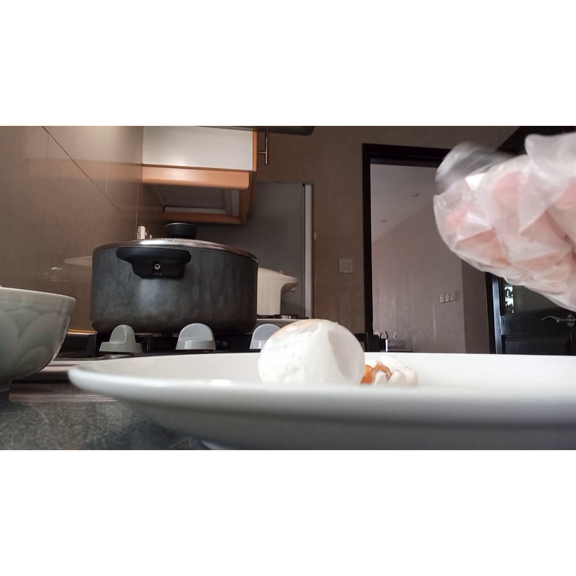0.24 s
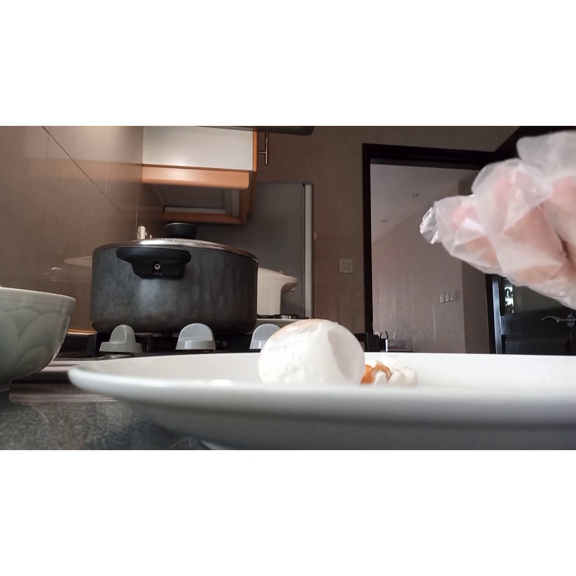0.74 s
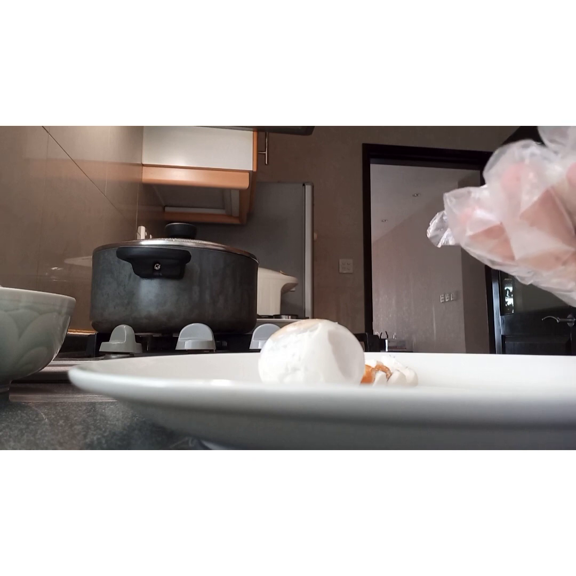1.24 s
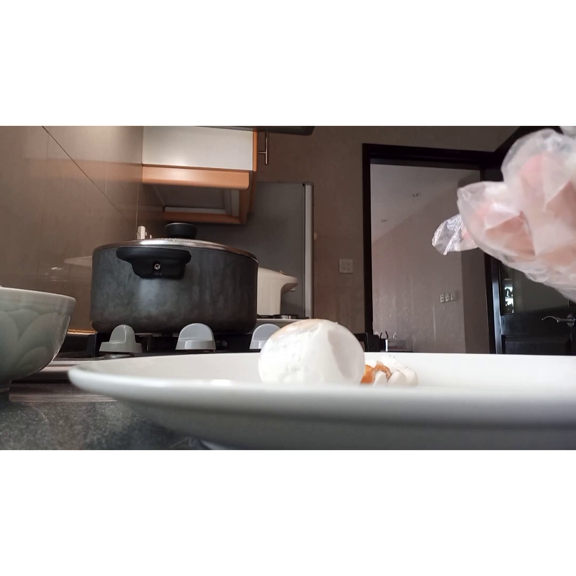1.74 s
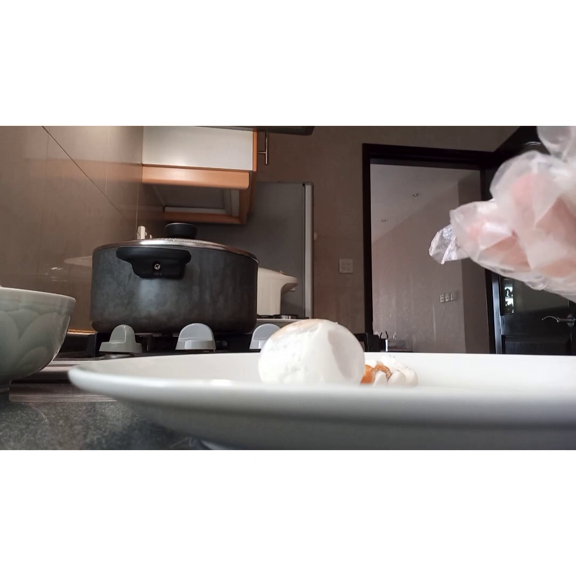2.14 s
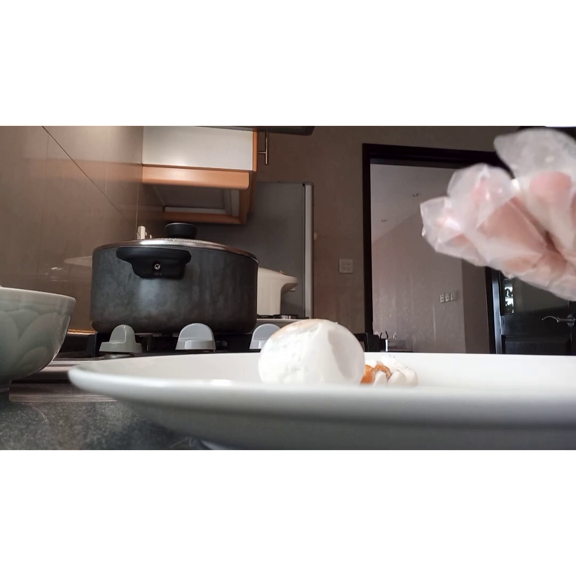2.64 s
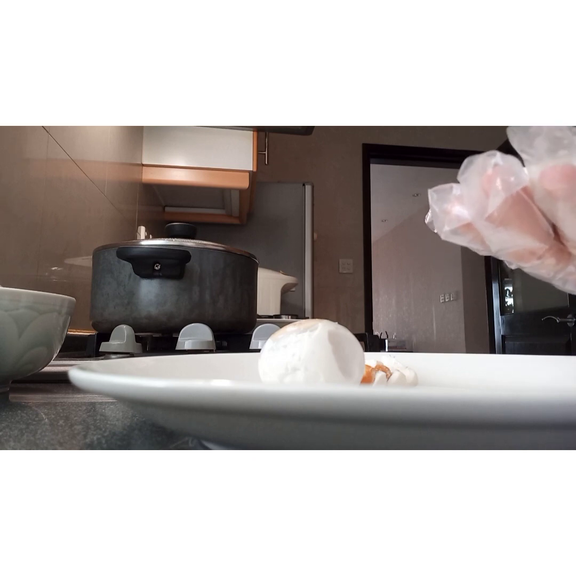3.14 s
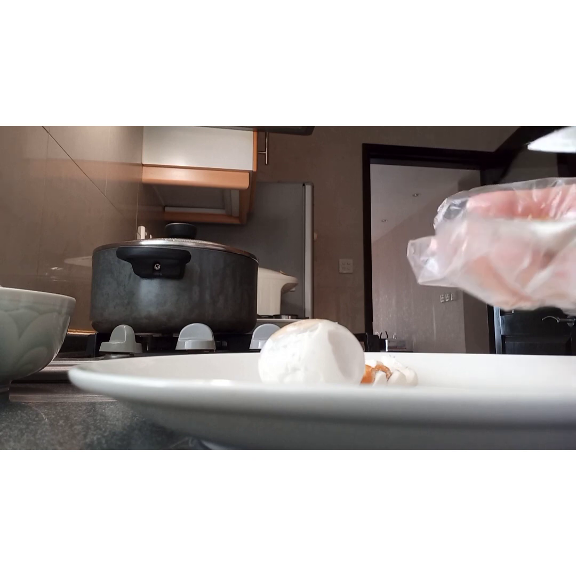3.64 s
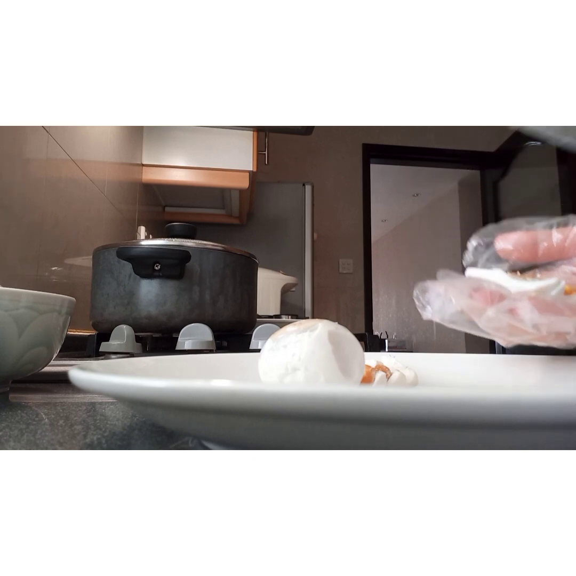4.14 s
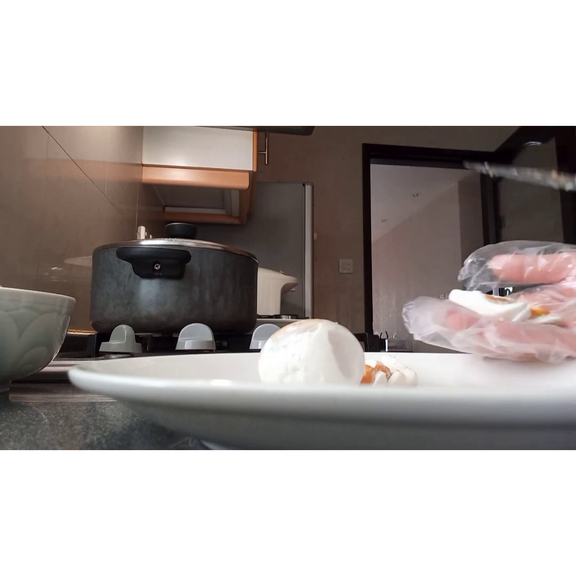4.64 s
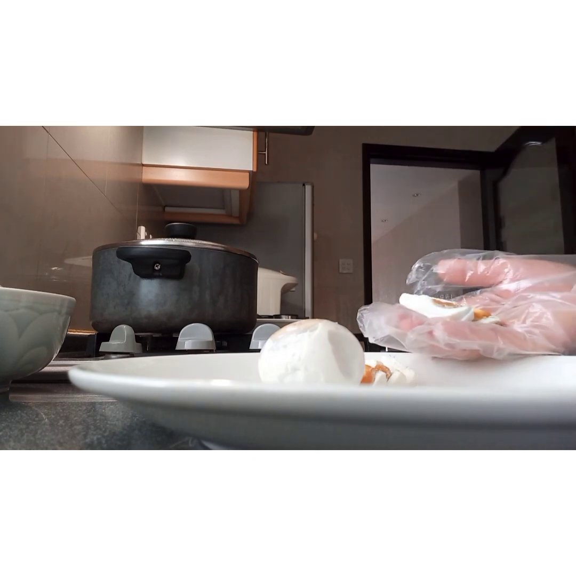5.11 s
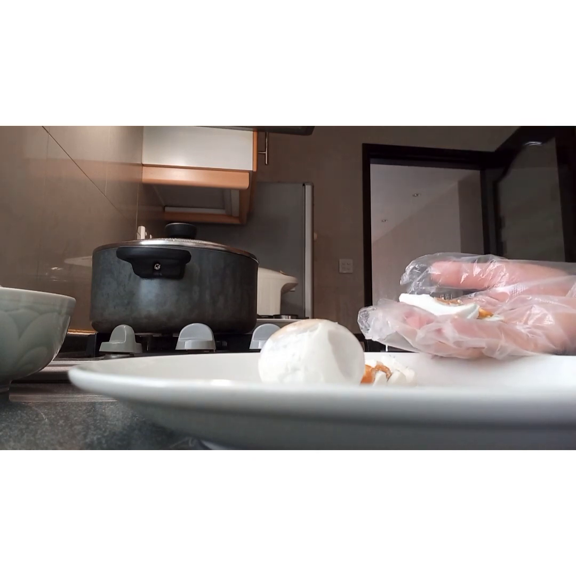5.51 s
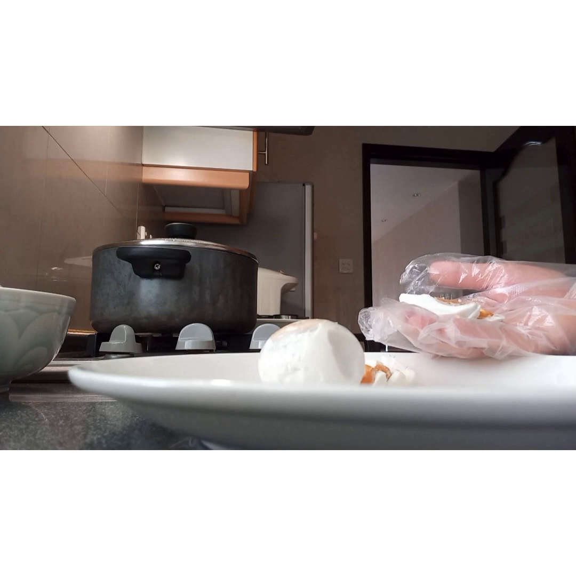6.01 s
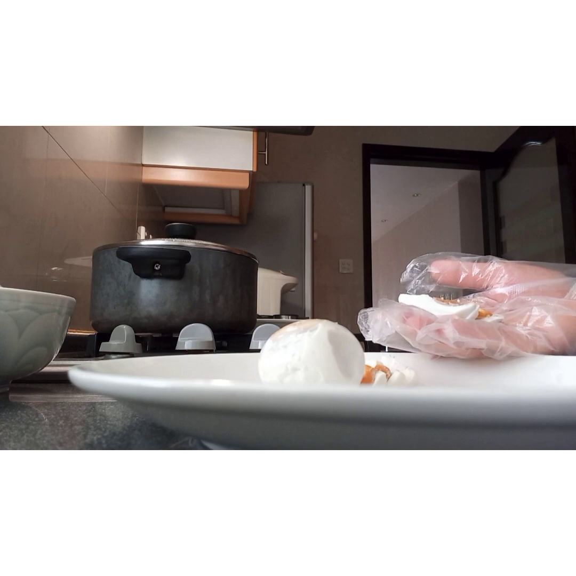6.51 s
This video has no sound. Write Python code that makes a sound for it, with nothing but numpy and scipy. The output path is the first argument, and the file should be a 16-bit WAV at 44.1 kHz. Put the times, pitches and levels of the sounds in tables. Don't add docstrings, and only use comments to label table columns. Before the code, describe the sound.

A small tiled kitchen heard close through a stereo phone, with a short bright reflection. An extractor fan runs throughout the first scene: low duct rumble swelling irregularly under a steadier airy rush that grows slightly stronger, plus faint hiss. From 0 to 2.1 seconds a thin plastic glove crinkles in flurries of tiny crisp clicks and separate snaps. From 2.1 to 3.4 it is mostly quiet, with only a few weak crackles. At about 3.5 the film pops again, becoming densest and loudest from 4.2 to 5.0, moving between sides. A knife gives a faint touch at 4.1, a hard bright tick near 4.5, and light taps around 5, with barely audible dragging squeaks. Sparse crackles settle until 5.8, leaving the fan. At 6.54 everything cuts to silence for about an eighth of a second, then a quieter low room rumble with hiss resumes at 6.66.

```python
import sys
import numpy as np
from scipy import signal
from scipy.fft import rfft, irfft, next_fast_len
from scipy.io import wavfile
from scipy.ndimage import uniform_filter1d

SR = 44100
rng = np.random.default_rng(int(sys.argv[2]) if len(sys.argv) > 2 else 0)


def ratio_of_db(decibels):
    return 10 ** (np.asarray(decibels, float) / 20)


def transcribe(signal):
    frames = np.atleast_2d(signal).T
    limited = np.clip(frames, -1, 1)
    pcm = np.round(limited * 32767).astype(np.int16)
    wavfile.write(sys.argv[1], SR, pcm)


N = 298554
TIME = np.arange(N) / SR
CUT_S, RESUME_S = 6.5361, 6.6627

# (time [s], turn to left port [dB], pressure on film [dB], contact with food [dB])
HAND = [(0, 2, -4, -2.5), (.3, 3, -0.5, -8), (.42, 3.5, 0, -2.5), (.5, 3, -2, -6), (.9, 4, -9.5, -3),
        (1.6, 5, -4, -1), (2.0, 0, -9.5, -4), (2.8, 0, -5, -6), (3.4, -2, -18, -5), (3.62, 2, -0.5, -6),
        (3.95, 3, -5.5, 0.5), (4.15, 0, 0, -1), (4.23, 12, 1.5, -1), (4.3, 21, 1, -0.5),
        (4.45, 2, -2, -0.5), (4.65, 9, 0.5, -1.5), (4.8, 5.5, 1, -1), (5.1, 0, -5.5, 2),
        (5.9, 7, -4.5, 1.5)]
# (peak time [s], level [dB], build-up
# [s per 10 dB], crisp top [dB], very top re top [dB])
CRUMPLES = [(.02, -66, -1.1, -0.5, 2), (.075, -65.5, 0.1, -5, -2), (.2, -68.5, .1, -3, -13),
            (.3, -63.5, 0.18, -0.5, -1), (.432, -65.5, 0.13, -1.5, 1), (.49, -69, 0.1, -6.5, -2),
            (.93, -85, -2.5, -5, -2), (1.035, -76.5, 0.5, -8.5, -3), (1.149, -74, 0.05, -2.5, -2),
            (1.319, -70.5, 0.06, -7, -2), (1.436, -69.5, 0.05, -5, -2.5), (1.595, -65.5, 0.07, -8, -1),
            (1.946, -79, .05, -5, -10), (2.057, -73, 0.14, -6.5, -6), (2.556, -80.5, .5, -11, -2),
            (2.762, -75, 0.07, -4, -4), (3.555, -75, 0.1, 0, -8), (3.495, -73, .05, -9, -3),
            (3.615, -64, 0.05, -2.5, -7), (3.935, -67, 0.06, -3.5, -2), (4.03, -75, 0.2, -10, -6),
            (4.08, -74.5, 0.1, -15, -0.5), (4.195, -63.5, 0.004, -8, -3), (4.242, -61, 0.0251, -7, -5),
            (4.31, -59, 0.07, -5, -2), (4.35, -71.5, 0.11, -5.5, -1), (4.492, -59.5, -0.02, 0, 0),
            (4.56, -70, 0.07, 2.5, -1.5), (4.65, -65.5, 0.14, -1.5, 0.5), (4.8, -60.5, 0.09, -3.5, -1),
            (4.88, -66, 0.04, -4, -5), (4.93, -66.5, 0.03, -2, -4), (5.002, -66.5, 0.18, -3, -8),
            (5.074, -73, -0.2, -4, 0),
            (5.14, -72.5, 0.67, -10, -4),
    (5.262, -75, .005, 3, 1),
    (5.32, -84, 0.1, 2, -4),
    (5.388, -70.5, 0.14, -7, -1),
    (5.435, -70.5, 0.07, -14, -2),
    (5.6, -73.5, -0.1, -6, -3),
    (5.686, -75, 0.04, 4, 1),
    (5.75, -71, 0.08, -8, -3),
]
# (time [s], peak [dB], crisp top [dB], very top re top [dB])
FINGER_SNAPS = [(.0144, -56, -12, -4), (.0204, -54, 3, -2), (.1496, -52, -10, -8), (0.168, -45, -8.5, -12),
                (0.1983, -49, -4, -10), (.223, -61, 5, 9), (.2573, -39.5, -20, -5), (0.303, -55, 8, 1),
                (.3755, -54, -9, -11), (0.4087, -41.5, -4.5, -4), (.4394, -56, 5, -3),
                (.4628, -46.5, -3, -2), (.49, -52, -8, -8), (0.535, -53, -15, -5), (.657, -68, 0, 2),
                (.7462, -63, -18, -5), (.8784, -67, -7, -5), (0.896, -54, -13, -5), (.9197, -54, 3, -7),
                (0.9892, -54.5, -4, -5), (1.013, -58, -8, -3), (1.0353, -49, -19, -5), (1.111, -55, -7, -5),
                (1.1309, -50.5, -4.5, -2), (1.155, -48.5, -4, -5), (1.215, -49.5, -21, -5),
                (1.2948, -48, -9, -5), (1.3234, -46, -6, -5), (1.3306, -45, -4, -5),
                (1.4278, -42.5, -13, -5), (1.4491, -59, -5, -2), (1.5147, -50, -12, -10),
                (1.5545, -57, -18, -5), (1.5634, -51, -6, -12), (1.5715, -37, -12, -3),
                (1.5767, -42, -7, -4), (1.587, -56, 3.5, -3), (1.6027, -46, 0.5, -0.5),
                (1.6605, -56.5, -15, -5), (1.688, -55, -14.5, -12), (1.713, -60, -1, -2),
                (1.813, -54, -22, -5), (1.865, -51, -14, -3), (1.909, -54, -20, -5),
                (1.9153, -51.5, -11, 1), (1.93, -58, 6, -14), (1.939, -46, 4, -17), (1.9912, -54, 0, -8),
                (2.044, -47, -8.5, -6), (2.0696, -44, -19, -10)]
# (time [s], peak [dB], crisp top [dB], very top re top [dB],
# left minus right [dB])
GRIP_SNAPS = [(3.4762, -58, -15, -5, 1), (3.4932, -47.5, -15, -3, 1), (3.5445, -47, -12, 1, -2),
              (3.55, -49.5, 5, -10, 4), (3.5912, -46, -1, -8, 1), (3.601, -34.5, -6, -6, -6),
              (3.6895, -49, -3, -8, 6), (3.88, -70, -2, -8, 1), (3.9346, -52, -8, -4, 1),
              (3.95, -44.5, -6, -12, 4), (3.908, -46, -3.5, 3, 6), (4.0145, -62, 4, -14, -1),
              (4.028, -60, 3, -12, 1), (4.154, -53, -17, -8, 7), (4.213, -47, 5, -7, 14),
              (4.1976, -57, -2, -3, 5), (4.236, -38, -4, -1, 2), (4.2491, -35, -3, -2, 3.5),
              (4.26, -45, -3, -5, -1), (4.3, -43, 5, -3, 5), (4.313, -39, 6, -4, 13),
              (4.317, -44.5, 8, -3, 9), (4.343, -43, 4, -3, 7), (4.527, -48, 0, -6, 1),
              (4.548, -50, -2, -6, 1), (4.5902, -53, 12, -10, 10), (4.626, -39, -14, -2, 18),
              (4.644, -42.5, -18, -8, -21), (4.663, -41.5, -5, -8, -14), (4.706, -46, -1, -3, -7),
              (4.7355, -40.5, -6, -1, 7), (4.746, -40, 2, -5, -4), (4.7723, -38.5, 7, -3, 18),
              (4.781, -38.5, -1, -3, -20), (4.838, -50, -21, -7, 7), (4.871, -52, -18, -5, -7),
              (4.8985, -48, -4, -10, 1), (4.9302, -48, -3, -3, -1), (4.9849, -39, 2, -6, -3),
              (4.994, -49, -10, -8, -10)]
# (time [s], peak [dB], crisp top [dB], very top re top [dB])
SETTLE_SNAPS = [(2.122, -70, 1, 1), (2.4364, -62, -15, -5), (2.5, -57, -11, -5), (2.7587, -52, -1, -5),
                (2.766, -55, -6, -8), (5.065, -42, -3, -5), (4.572, -50, -1, -3), (4.192, -54, -1, -3),
                (4.356, -49, -9, -6), (4.682, -47, -12, -6), (4.6, -49, -12, -3), (4.7, -50, -6, -6),
                (3.899, -51, -16, -4), (3.667, -65, 6, -12), (0.52, -54, -10, -6), (0.34, -54, -1, -4),
                (.595, -58, -4, -10), (1.4195, -48, -8, -3), (1.143, -58, 5, -10), (1.738, -63, 3, -3),
                (1.461, -62, 3, 5), (.931, -57, -15, -5), (.42, -50, -4, -4), (.392, -53, -2, -3),
                (2.093, -58, -10, -8), (5.2578, -49, -15, 0), (5.5, -62, 1, -2), (5.1, -51, -10, -8),
                (5.3345, -56, -6, -8), (5.355, -60, -1, -2), (5.368, -41, -7, -3), (5.388, -56, -8, -8),
                (5.431, -41.5, -20, -2), (5.4, -60, -10, -3), (5.5, -53, -14, -2), (5.5938, -54, -6, -4),
                (5.5999, -49, -17, -8), (5.8, -52, -4, 3), (5.6814, -49, 6, -5), (5.736, -59, -2, -10),
                (5.7441, -54, 1, -5), (5.786, -65, -3, -10), (5.8256, -61, -5, -1)]
# (frequency [Hz], density [dB per Hz])
FILM_SPECTRUM = [(700, -24), (1050, -10), (1600, -12.5), (2000, -19), (3000, -18.5), (3900, -18),
                 (5100, -8.5), (5500, -2), (6900, 2.5), (7300, -11), (9500, -2), (12500, -9),
                 (15600, -17.5), (16100, -48.5)]
ZONE_EDGES_HZ = (3680, 4640, 7500, 12140)

# (time [s], peak [dB], left minus right [dB], low ping [dB], pitch ratio [1])
HARD_TICKS = [
    (4.4843, -24, 3.5, -4.5, 1),
]
SOFT_TICKS = [
    (4.0905, -48, -7, -5, 1.07),
    (4.434, -39, -4, -30, 1.09),
    (4.9546, -38.5, -8, -15, 1.01),
    (5.0591, -30.5, -5, -13, 1.01),
    (5.1257, -41, -8, -28, 1.02),
]
# (frequency [Hz], level [dB], T60 [s])
BLADE_MODES = [(4050, -8, .015), (5650, -2, .016), (6869, -2, .02), (7924, -5, .018), (9534, -5, .03),
               (11070, -5, .03), (11290, -9, .03), (12300, -6, .006), (13270, -15, .06), (14800, -8, .012)]
HANDLE_MODES = [(5600, 0, .012), (5950, -2, .02), (6400, -2, .01), (6850, -4, .012), (9700, -11, .006),
                (11500, -14, .008)]
PING_MODES = [(2640, -7, .04), (2725, -11, .03)]
# (start [s], length [s], frequency [Hz], level [dB])
SQUEAKS = [
    (4.905, .05, 2350, -66),
    (4.24, .09, 1070, -56),
    (4.29, .07, 315, -48),
    (2.04, .07, 395, -51),
]

# (time [s], air rush [dB])
FAN_EFFORT = [
    (0.0, -53.5),
    (.8, -55),
    (1.3, -55),
    (2.3, -55),
    (3.3, -52.5),
    (4.3, -50),
    (5.8, -49),
    (6.53, -49),
]
# (peak time [s], rumble [dB], build-up [s per 10 dB])
SURGES = [(.31, -45.5, 0.5), (.6, -43, 0.2), (1.33, -46, 0.24), (1.65, -45, 0.5), (1.95, -54, -1.5),
          (2.33, -49.5, 1.25), (2.441, -39, -0.6), (2.75, -49, 1.6), (3.09, -47, 0.52), (3.5, -47.5, 0.4),
          (3.761, -47.5, 0.24), (4.07, -41, 0.13), (4.36, -41, 0.17), (4.82, -42.5, -0.36),
          (5.1, -46, 0.58), (5.4, -43.5, .5), (5.65, -50.5, 0.1), (5.87, -40.5, 0.1), (6.0, -46, 0.6),
          (6.199, -41, -0.22), (6.37, -48.5, 1), (6.53, -42, 0.46)]
# (frequency [Hz], density [dB per Hz])
RUMBLE_SPECTRUM = [(12, -63), (22, -44), (34, -38), (56, -11), (81, 2.5), (96, 2), (119, -6.5), (146, -0.5),
                   (173, -14), (190, -11), (250, -39), (420, -120)]
RUSH_SPECTRUM = [(100, -24), (170, -8), (256, -3), (333, -2.5), (374, -3), (508, -10), (942, -18.5),
                 (1160, -25.5), (1450, -23.5), (1780, -35), (2600, -47.5), (3380, -73), (5720, -120)]
HISS_SPECTRUM = [(1180, -29.5), (2000, -5.5), (2760, -7.5), (2970, -9), (3760, -8.5), (4060, -7),
                 (5150, -11.5), (5620, -7), (6690, -4.5), (7050, -15), (7240, -18), (7970, -22),
                 (12800, -14.5), (15200, -14), (16200, -23)]
LATER_SPECTRUM = [(20, -51), (40, -29), (60, -1), (80, -1), (110, -23.5), (150, -10.5), (200, -31),
                  (300, -21.5), (450, -30.5), (670, -39), (1000, -37), (1600, -41), (2500, -75),
                  (3200, -90.5)]
# (frequency [Hz], left-right likeness [1])
LIKENESS = [(60, 1), (130, 0.96), (290, 0.95), (640, 0.49), (1410, -0.13), (3100, 0.1), (6820, 0.14),
            (15000, 0.13)]
# (frequency [Hz], left minus right [dB])
LEAN = [(60, -1), (110, 0.5), (200, 3.5), (380, 0), (700, -1), (1290, -3.5), (2380, 0), (4400, 1),
        (8120, 3), (15000, -0.5)]


def rustle(per_s=1800, scatter_db=5.5, biggest_db=15):
    fall_s_per_10db = 0.066
    resting_db, resting_top_db, still_s = -87, -15.5, 5.9
    s, db, build_s, top_db, tilt_db = np.transpose(CRUMPLES)
    power = swells(s, db, build_s, fall_s_per_10db)
    rest = ratio_of_db(resting_db - 60 * np.clip(TIME - still_s, 0, 1)) ** 2
    total = spread(power.sum(axis=0)) + rest
    top_db = (spread(top_db @ power) + resting_top_db * rest) / total
    tilt_db = spread(tilt_db @ power) / total
    db = 10 * np.log10(total)

    hand_s, *hand = np.transpose(HAND)
    top_pan_db, body_db, deep_db = (np.interp(TIME, hand_s, c) for c in hand)
    pan_db = -0.5 - 0.088 * top_pan_db
    levels_db = [body_db + deep_db, body_db - 3.0, 0, top_db - 3.0, top_db + tilt_db - 2.5]
    pans_db = [pan_db, pan_db, pan_db, top_pan_db, top_pan_db]
    flurry = ratio_of_db(2.2 * walk(60))
    out = 0
    for h, rel_db, lean_db in zip(zones(), levels_db, pans_db):
        chance = rng.random((40000, 2))
        s = np.cumsum(-np.log(chance[:, 0])) / per_s
        keep = s < TIME[-1]
        size = ratio_of_db(np.minimum(-scatter_db * np.log(chance[keep, 1]), biggest_db))
        train = clicks(s[keep], [size, size], .0006, paths=2)
        out = out + unit(ring(train, h[None]) * flurry) * sides(db + rel_db + 1.5, lean_db)
    return out


def snaps():
    finger_pan_db, settle_pan_db = -10, 7
    rows = [(*r, finger_pan_db) for r in FINGER_SNAPS]
    rows += [tuple(r) for r in GRIP_SNAPS]
    rows += [(*r, settle_pan_db) for r in SETTLE_SNAPS]
    s, db, top_db, tilt_db, pan_db = np.transpose(sorted(rows))
    gain = sides(db, .5 * pan_db)
    train = clicks(s, gain, .0011, paths=7, fade=.55)
    crisp = clicks(s, gain, .0006, paths=9, fade=.78)
    pressure_db = np.interp(s, *np.transpose(HAND)[::2])
    body_db = -10 + 0.9 * pressure_db + 0.24 * top_db
    at = np.searchsorted(s * SR, np.arange(N) + .5).clip(1) - 1
    levels_db = [body_db + 0.7, body_db + 1.5, 0 * db - 0.6, top_db - 4.0, top_db + tilt_db - 4.0]
    trains = [train, train, train, crisp, crisp]
    return sum(ring(x * ratio_of_db(rel_db[at]), h[None]) for h, rel_db, x in zip(zones(), levels_db, trains))


def zones():
    hz = np.linspace(0, SR / 2, 513)
    below = [0] + [1 / (1 + (hz / edge) ** 24) for edge in ZONE_EDGES_HZ] + [1]
    film_db = colour(FILM_SPECTRUM, hz)
    return [causal(film_db + 10 * np.log10(b - a + 1e-5)) for a, b in zip(below, below[1:])]


def clicks(s, gain, spread_s, paths=3, fade=.7):
    out = np.zeros((2, N + 2000))
    chance = rng.random((len(s), 2, paths, 2))
    for ch in range(2):
        for k in range(paths):
            delay = chance[:, ch, k, 0] * spread_s * SR * (k + .2)
            at = (s * SR + delay).astype(int)
            sign = np.sign(chance[:, ch, k, 1] - .5)
            np.add.at(out[ch], at, gain[ch] * sign * fade ** k)
    return out[:, :N]


def ticks(events, modes, trim_db, crack_db, low_hz, top_hz):
    crack_t60_s = 0.022
    s, db, pan_db, ping_db, pitch = np.transpose(events)
    touch = np.abs(clicks(s, sides(db, pan_db), .0001, paths=1))
    t = TIME[:SR // 20]
    shared, left, right = rng.standard_normal((3, len(t)))
    band = signal.butter(3, [low_hz, top_hz], "band", fs=SR, output="sos")
    crack = signal.sosfilt(band, [shared + 0.39 * left, shared + 0.47 * right])
    crack = crack * ratio_of_db(crack_db) * 1000 ** (-t / crack_t60_s) * np.clip(t / 0.00074, 0, 1)
    push = np.abs(clicks(s, sides(db + trim_db + ping_db + 4.0, pan_db), 0.00044, paths=1))
    rung = 0
    for at, ratio in zip(s, pitch):
        one = touch * (np.abs(TIME - at) < .01)
        rung = rung + ring(one, bell(modes * np.array([ratio, 1, 1]), 0.00093))
    return ratio_of_db(trim_db) * rung + ring(touch, crack) + ring(push, bell(PING_MODES, 0.0017))


def bell(modes, rise_s):
    t = TIME[:SR // 8]
    rise = np.sin(np.pi / 2 * np.clip(t / rise_s, 0, 1)) ** 2
    tones = sum(ratio_of_db(db) * np.sin(2 * np.pi * hz * t) * 1000 ** (-t / t60) for hz, db, t60 in modes)
    return tones[None] * rise


def squeaks():
    out = 0
    for s, length, hz, db in SQUEAKS:
        swell = np.sin(np.pi * np.clip((TIME - s) / length, 0, 1))
        phase = 2 * np.pi * np.cumsum(hz * (1 + .04 * walk(120))) / SR
        port_phase = np.array([[0], [hz / 600]])
        out = out + ratio_of_db(db + 3 * walk(90)) * swell * np.sin(phase + port_phase)
    return out


def kitchen(x):
    t60_s, tail_db = 0.11, -6
    t = TIME[:SR // 2]
    tail = rng.standard_normal((2, len(t))) * 1000 ** (-t / t60_s) * np.clip(t / 0.00043, 0, 1)
    return x + ring(x, unit(tail) / np.sqrt(len(t)) * ratio_of_db(tail_db))


def fan():
    fall_s_per_10db, lull_db = 0.065, -4
    rush_follows = 0.18
    rush_db = np.interp(TIME, *np.transpose(FAN_EFFORT))
    surge = spread(swells(*np.transpose(SURGES), fall_s_per_10db).sum(axis=0))
    rumble_db = 10 * np.log10(surge + ratio_of_db(rush_db + lull_db) ** 2)
    rumble = air(RUMBLE_SPECTRUM) * ratio_of_db(rumble_db - 1.5 + 1.6 * walk(19))
    rush_db = rush_db + rush_follows * (rumble_db - rush_db)
    return rumble + air(RUSH_SPECTRUM) * ratio_of_db(rush_db + 0.29 + 0.98 * walk(10))


def microphone_hiss():
    return air(HISS_SPECTRUM, 0) * ratio_of_db(-79 + 0.33 * TIME)


def later_kitchen():
    step = ratio_of_db(-52) * np.exp(-np.abs(TIME - RESUME_S) / .004)
    return air(LATER_SPECTRUM) * ratio_of_db(-51) + step


def air(table, alike=1):
    size = next_fast_len(N)
    hz = np.arange(size // 2 + 1) * SR / size
    mid, side = rfft(rng.standard_normal((2, size)))
    c = np.clip(alike * colour(LIKENESS, hz), -.9, .975)
    sign = np.array([[1], [-1]])
    both = np.sqrt(1 + c) * mid + sign * np.sqrt(1 - c) * side
    port_db = colour(table, hz) + sign * colour(LEAN, hz) / 2
    return unit(irfft(both * ratio_of_db(port_db), size)[:, :N])


def swells(s, db, build_s, fall_s):
    late = TIME[::64] - s[:, None]
    build_s = np.maximum(build_s, .002)[:, None]
    return ratio_of_db(db[:, None] - 10 * np.maximum(late / fall_s, -late / build_s)) ** 2


def spread(v):
    return np.interp(TIME, TIME[::64], v)


def walk(rate_hz):
    k = int(SR / rate_hz)
    held = np.repeat(rng.standard_normal(N // 100), k)[:N]
    return uniform_filter1d(uniform_filter1d(held, k), k)


def colour(table, hz):
    f, v = np.transpose(table)
    return np.interp(np.log(np.maximum(hz, 1)), np.log(f), v)


def causal(db):
    size = 2 * (len(db) - 1)
    cep = irfft(db * np.log(10) / 20)
    cep[1:size // 2] *= 2
    h = irfft(np.exp(rfft(cep[:size // 2 + 1], size)))
    return h / np.abs(signal.hilbert(h)).max()


def ring(x, h):
    return signal.oaconvolve(x, h, axes=-1)[..., :N]


def sides(db, pan_db):
    return ratio_of_db(np.array([db + pan_db / 2, db - pan_db / 2]))


def unit(x):
    return x / np.sqrt(np.mean(x ** 2))


def scene():
    knife = ticks(HARD_TICKS, BLADE_MODES, -9.5, -11, 2800, 18000)
    knife = knife + ticks(SOFT_TICKS, HANDLE_MODES, -4.5, -16.5, 5300, 13000) + squeaks()
    hiss = microphone_hiss()
    first = fan() + kitchen(rustle() + snaps() + knife) + hiss
    second = later_kitchen() + hiss * ratio_of_db(-0.5)
    return first * np.clip((CUT_S - TIME) * 500, 0, 1) + second * (TIME > RESUME_S)


def top_cut(x):
    return signal.sosfilt(signal.butter(12, 16650, fs=SR, output="sos"), x)


def record(dry):
    low_pass = signal.ellip(8, .2, 40, 15900, fs=SR, output="sos")
    mix = signal.sosfilt(low_pass, dry)
    return top_cut(mix)


dry = scene()
out = record(dry)
transcribe(out)
```